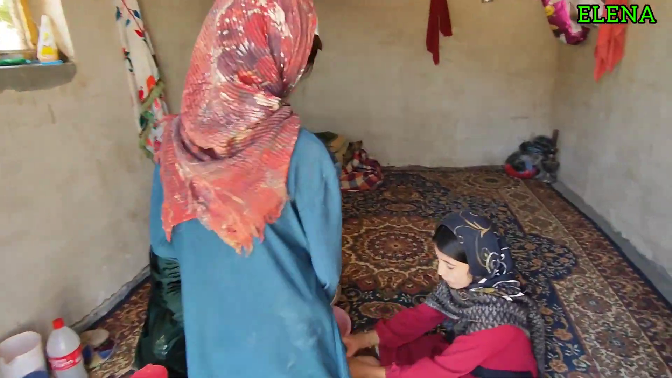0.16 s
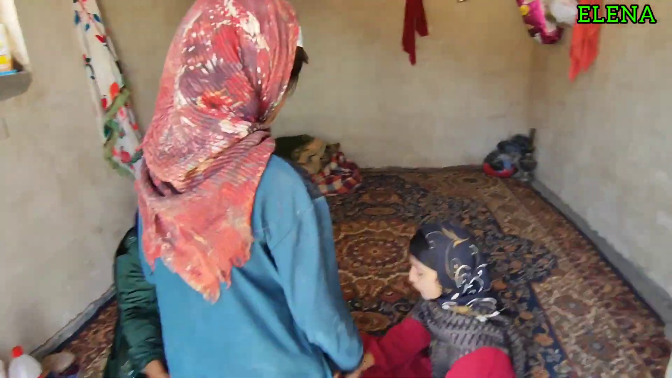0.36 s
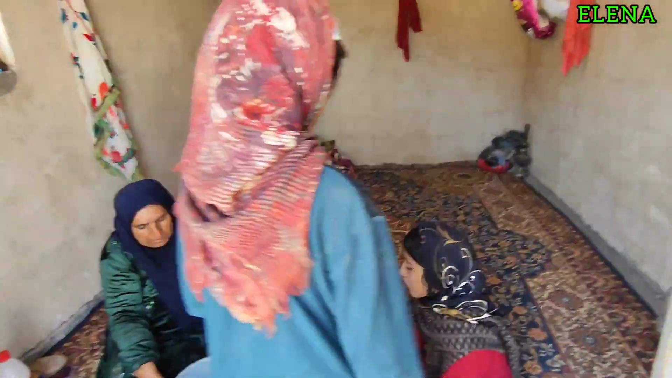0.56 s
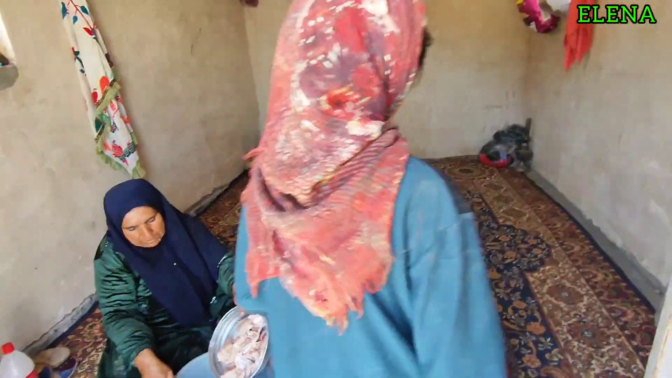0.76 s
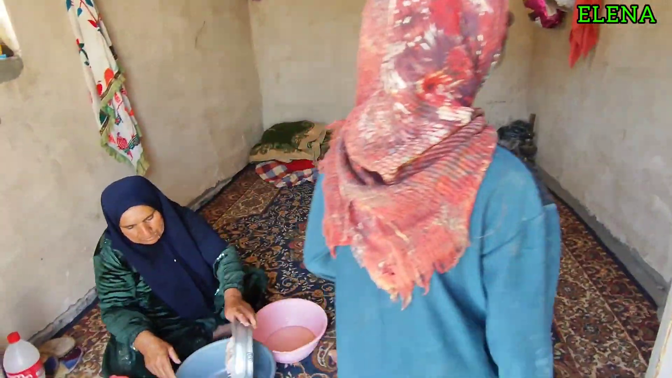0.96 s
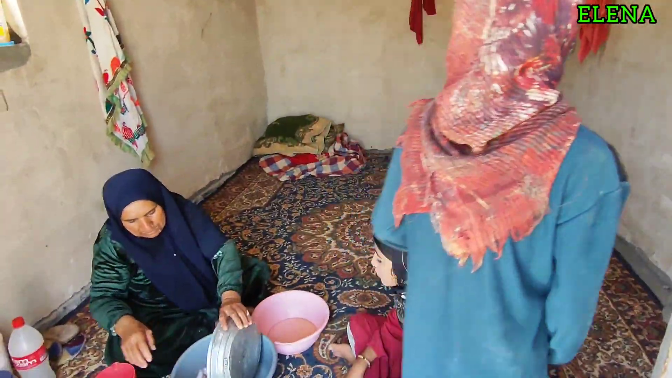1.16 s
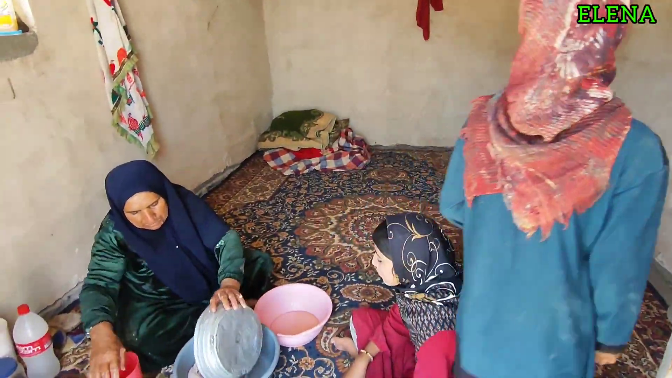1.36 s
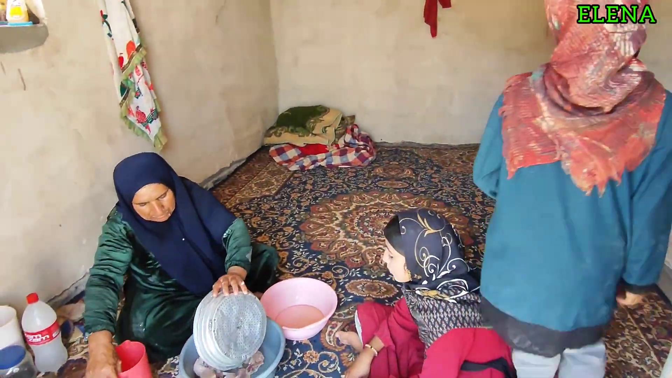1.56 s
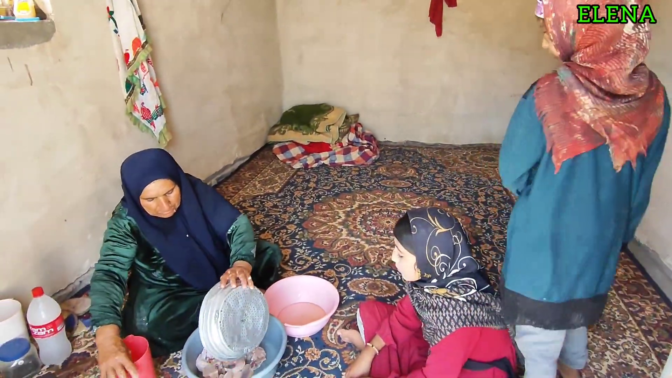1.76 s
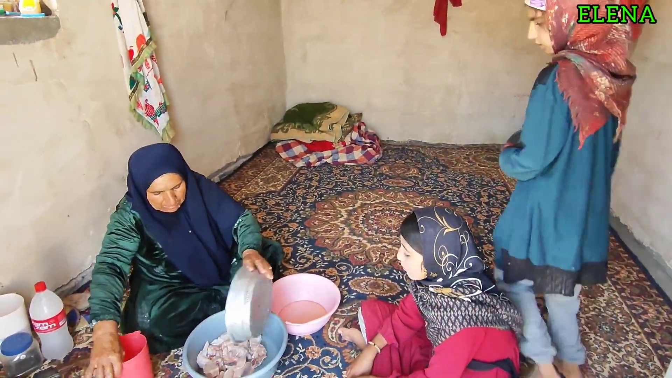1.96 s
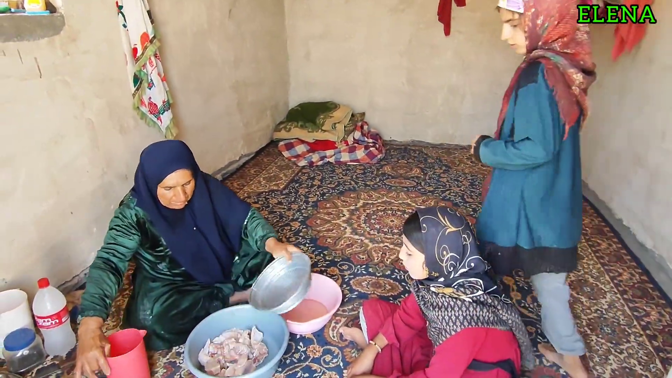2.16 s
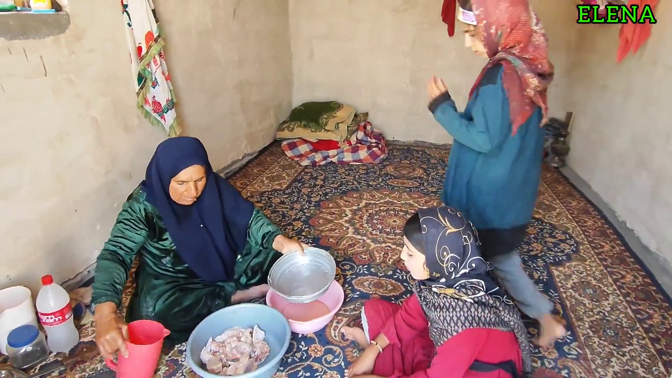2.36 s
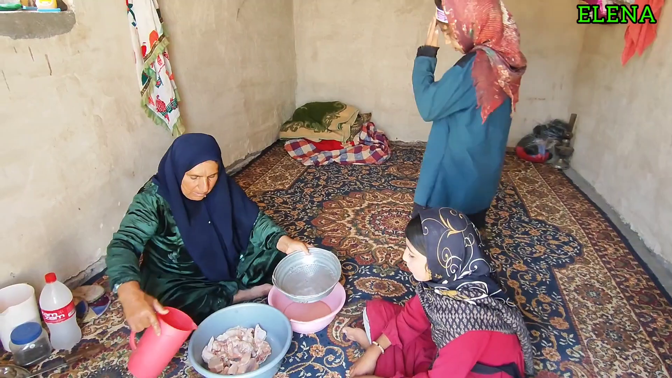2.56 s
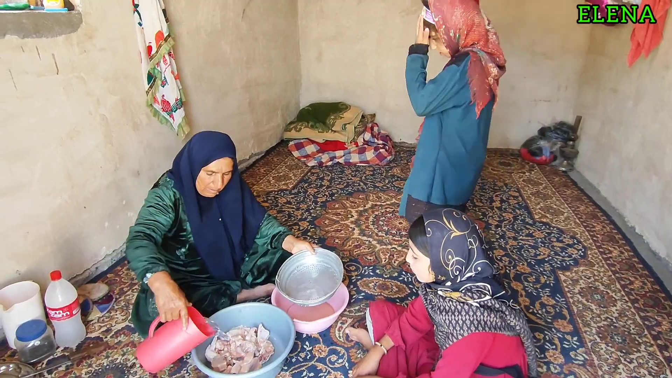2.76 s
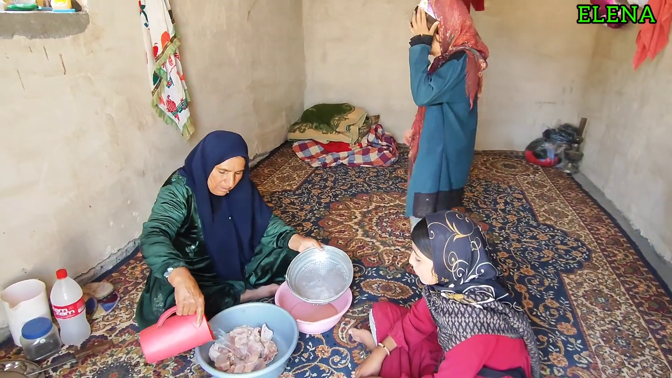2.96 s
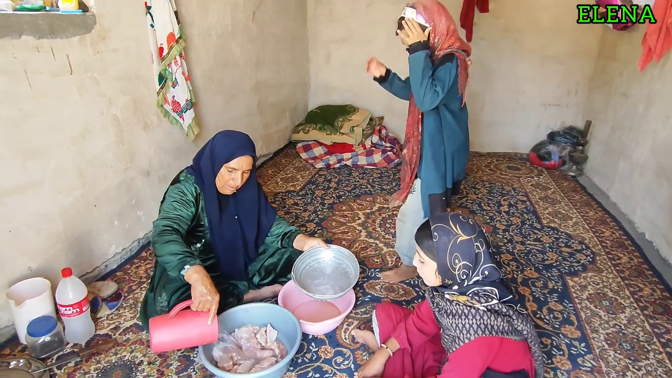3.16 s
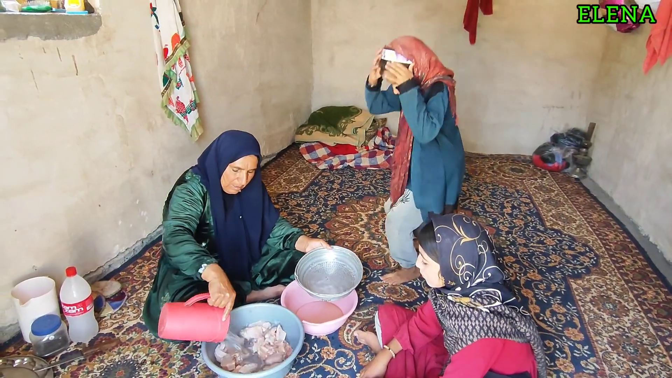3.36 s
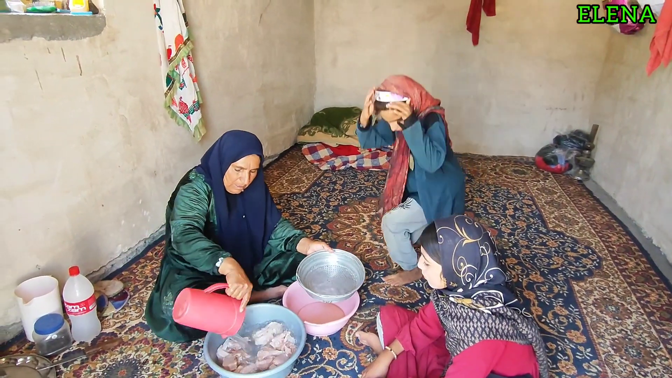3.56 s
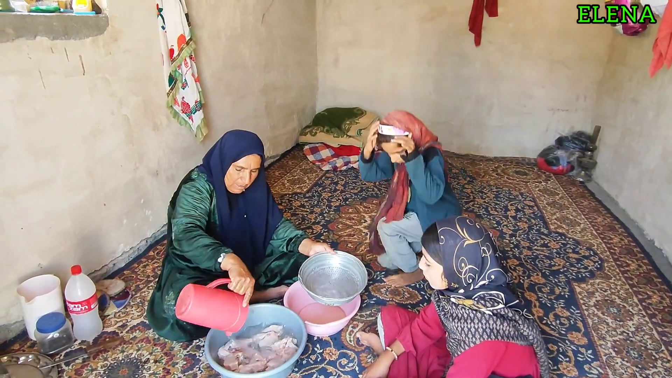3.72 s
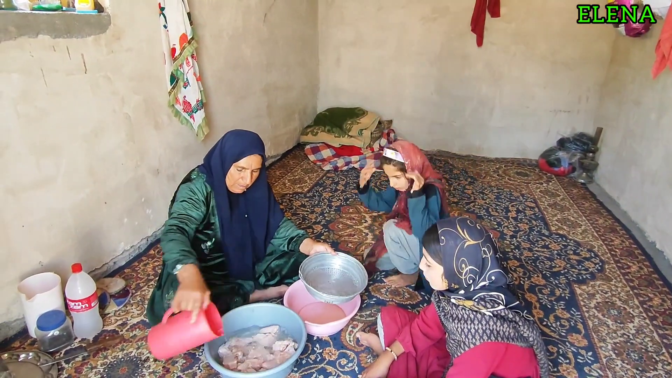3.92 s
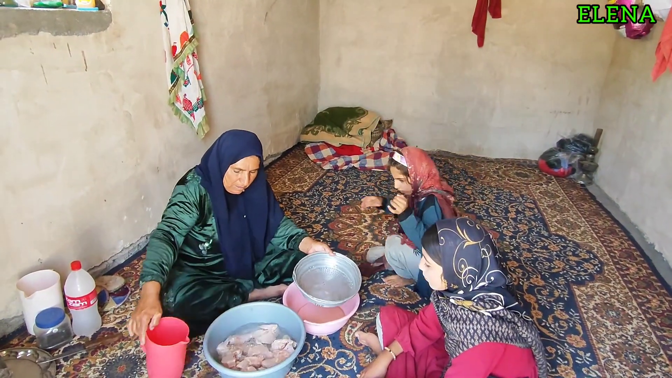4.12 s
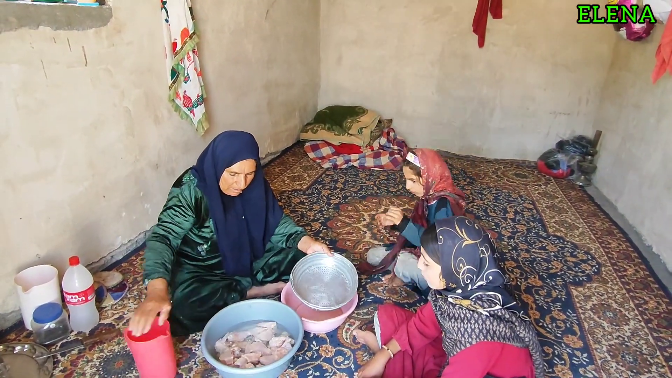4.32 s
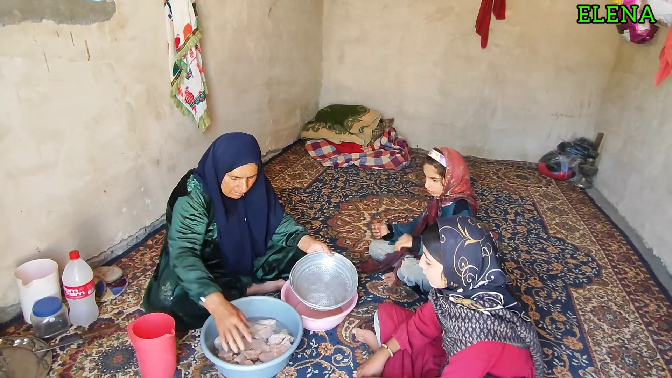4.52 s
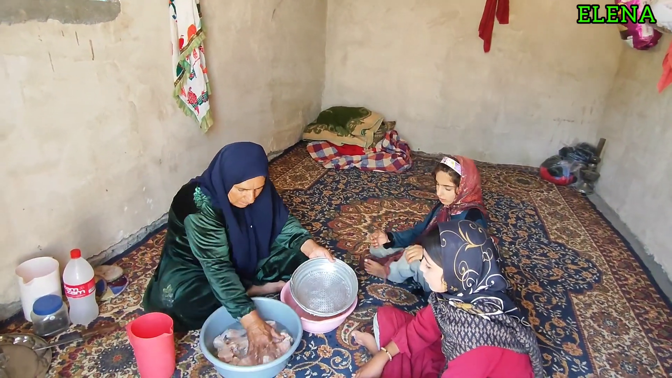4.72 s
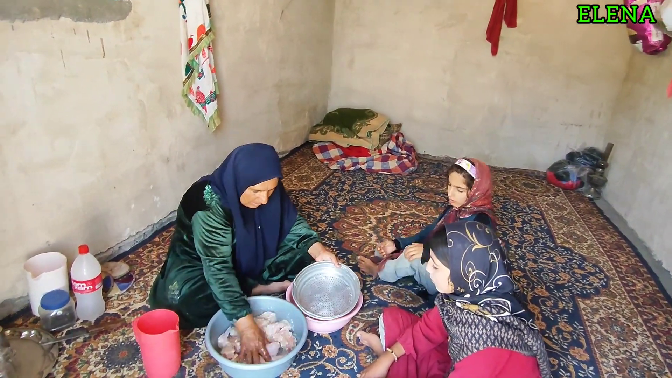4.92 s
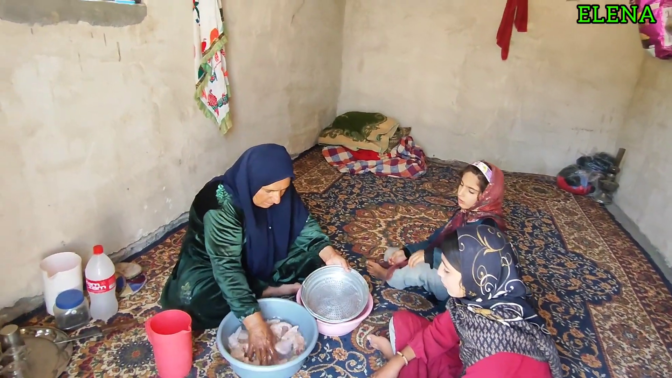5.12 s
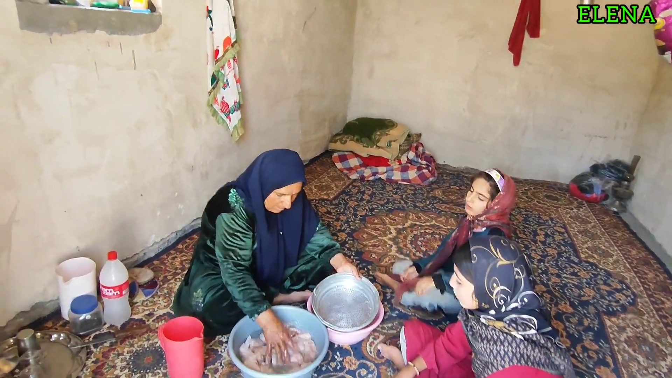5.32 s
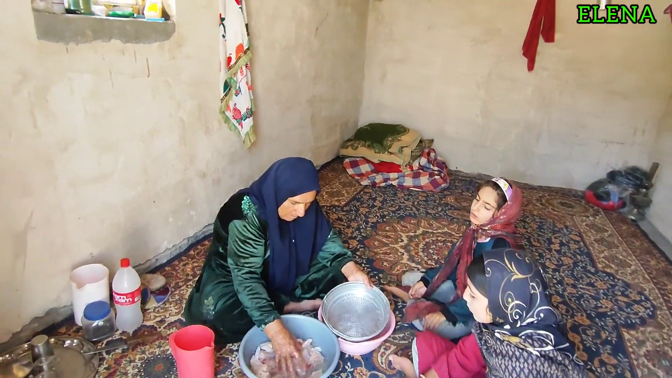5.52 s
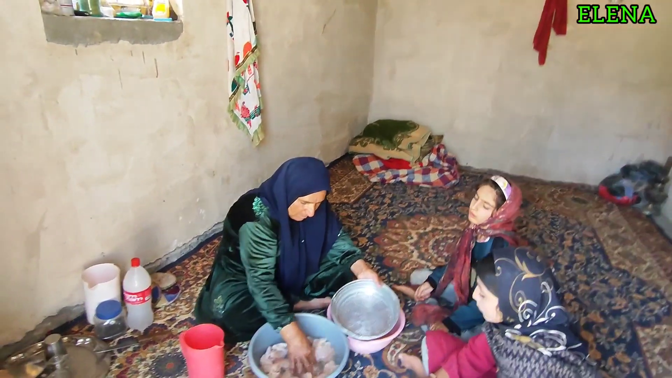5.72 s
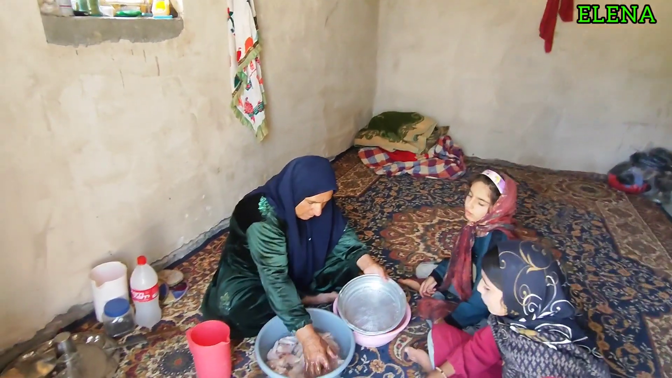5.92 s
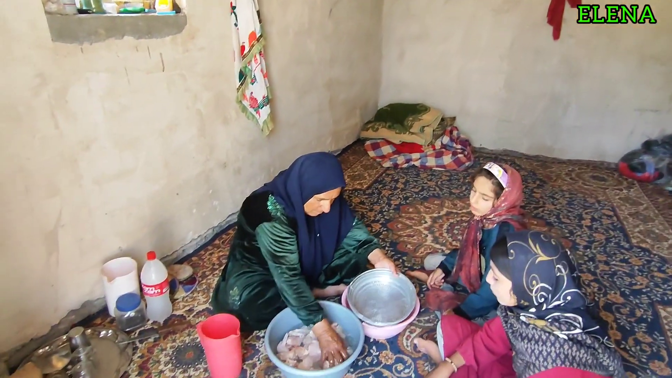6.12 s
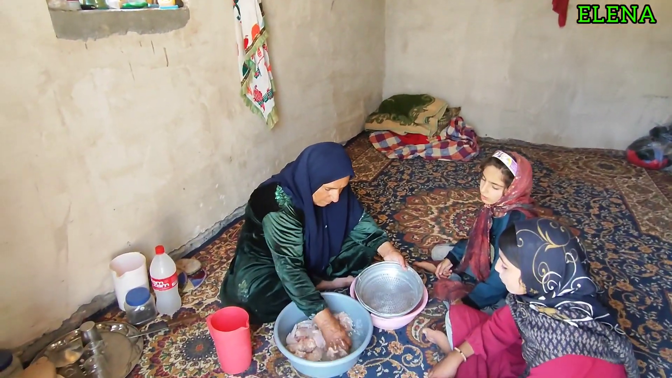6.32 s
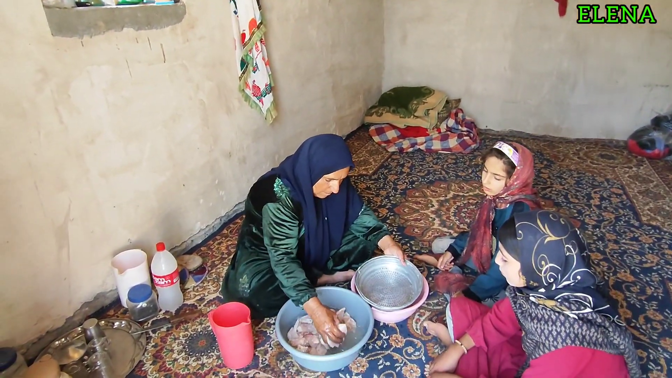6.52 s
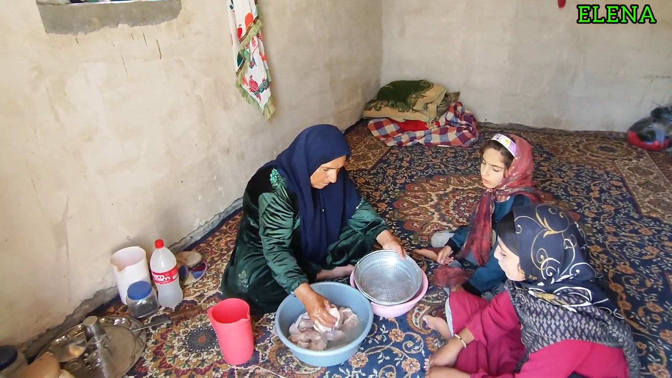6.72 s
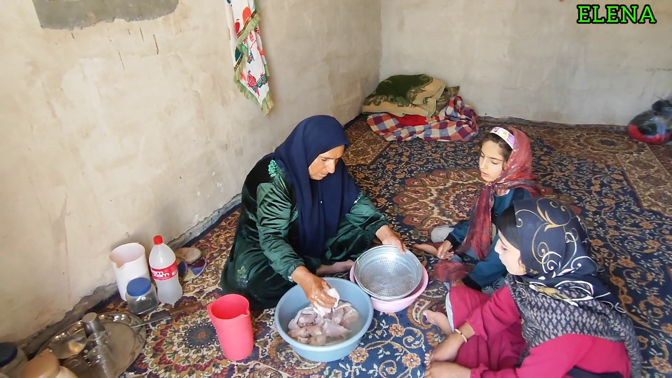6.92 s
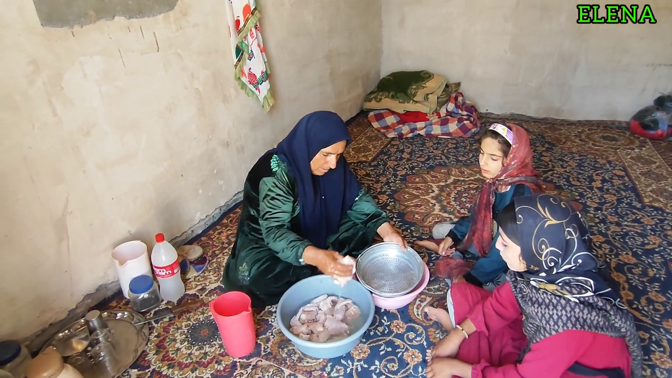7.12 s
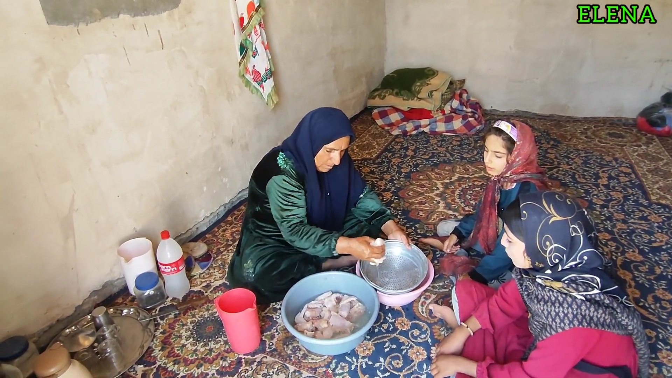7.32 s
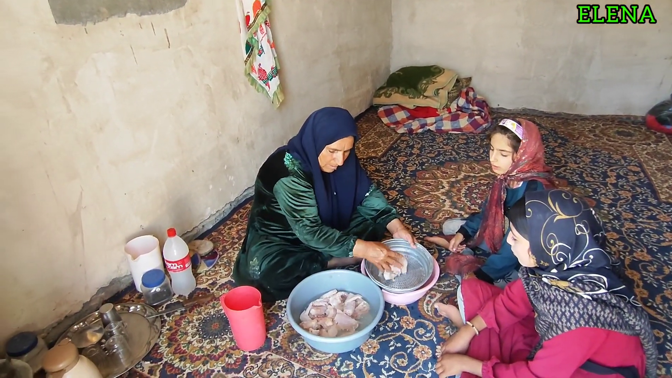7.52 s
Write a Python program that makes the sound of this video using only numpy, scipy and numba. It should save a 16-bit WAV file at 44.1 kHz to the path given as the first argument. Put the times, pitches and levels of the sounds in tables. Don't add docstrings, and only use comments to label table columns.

```python
import sys
import numpy as np
from scipy import signal
from scipy.fft import rfft, irfft, next_fast_len
from scipy.io import wavfile
from numba import njit

SR = 44100
rng = np.random.default_rng(int(sys.argv[2]) if len(sys.argv) > 2 else 0)


def gain_from_db(level_db):
    decades = np.asarray(level_db, float) / 20
    return 10 ** decades


def waveform_to_disk(signal):
    frames = np.transpose(np.atleast_2d(signal))
    scaled = np.clip(frames, -1, 1) * 32767
    samples = np.round(scaled).astype(np.int16)
    wavfile.write(sys.argv[1], SR, samples)


N = 338688

# frequency in Hz, level in dB per Hz.
HUSH_COLOUR = [(12, -59), (20, -14), (48, -5), (69, -9.5), (86, -2), (266, -9.5), (341, -14), (449, -12.5),
               (870, -23), (1030, -23.5), (1930, -26), (3900, -29.5), (5800, -31), (7900, -34),
               (11600, -25.5), (14400, -30)]
# time in seconds, level in dB.
HISS_LIFT = [(0, -3), (1.9, -5.5), (2.3, -8.5), (2.8, -6.5), (3.9, 2), (4.4, 2.5), (4.5, -0.5),
             (7.68, -4.5)]
# frequency in Hz, likeness from -1 to 1.
PORT_LIKENESS = [(60, 0.51), (180, 0.9), (530, 0.29), (1580, -0.16), (4700, 0.089), (14000, -0.19)]
# frequency in Hz, time to die 60 dB in seconds.
ROOM_T60 = [(100, 0.39), (400, 0.14), (1500, 0.22), (5000, 0.16), (14000, 0.14)]
# frequency in Hz, left minus right in dB.
PORT_COLOUR = [(60, 2), (110, 1), (200, 1), (370, -2.5), (680, 0), (1240, 1), (2270, -3.5), (4160, 2.5),
               (8500, -13), (14000, -5)]
# samples by which left leads, left minus right in dB.
SPOTS = [(21, -0.5), (12, -6), (3, -1)]
# start in seconds, peak in dB, pitch in Hz.
FOOTFALLS = [(1.299, -52, 50), (3.799, -51, 43.1), (4.056, -52.5, 85), (7.598, -50, 48)]
# start in seconds, peak in dB, pitch in Hz, time to die 60 dB in seconds.
FLOOR_THUDS = [(0.26, -42, 152, 0.18), (0.382, -32, 126, 0.27), (0.902, -42.5, 225, 0.1),
               (1.137, -42, 188, 0.13), (1.17, -34.5, 127, 0.14), (1.464, -45, 140, 0.14),
               (2.72, -44, 130, 0.06), (2.99, -48, 145, 0.11), (4.198, -38.5, 149, 0.1)]
# start in seconds, peak in dB, pitch in Hz, time to die 60 dB in seconds.
JUG_AND_BOWL = [
    (4.195, -25, 360, 0.045),
    (4.21, -38, 440, 0.11),
    (4.225, -32.5, 360, 0.17),
    (4.198, -33.5, 206, 0.06),
    (7.618, -22, 478, 0.05),
    (7.642, -39, 470, .1),
    (7.57, -33, 640, .06),
]
# start in seconds, peak in dB, pitch in Hz, time to die 60 dB in seconds.
SIEVE_PINGS = [(0.246, -24.5, 1153, 0.035), (0.262, -33, 2080, 0.03), (0.249, -32.5, 560, 0.058),
               (0.25, -33, 1430, 0.03), (0.905, -24, 1030, 0.014), (0.903, -26, 620, .014),
               (1.144, -27, 1100, .03), (1.139, -24.5, 1145, 0.025), (1.209, -36, 1125, 0.048),
               (1.465, -51, 890, 0.027), (2.718, -54, 986, 0.02), (7.432, -41.5, 1200, 0.0053),
               (7.432, -47, 3100, 0.004), (7.564, -25.5, 2260, 0.022), (7.57, -33, 782, 0.047)]
# start in seconds, time held in seconds, level in dB, low edge in Hz, high edge in Hz.
SCUFFS = [(0.866, .04, -42, 1500, 4600), (1.085, .015, -42, 1100, 3600), (1.61, .025, -63, 2200, 5000),
          (1.698, .04, -58, 1000, 5500), (1.737, .035, -51, 500, 1500), (2.087, .02, -62, 2400, 6000),
          (2.168, .06, -63, 2500, 6000), (5.684, .035, -55, 2900, 6000), (5.77, .055, -59, 2300, 3100),
          (5.848, .012, -62, 1000, 3600), (6.012, .055, -62, 3800, 4700), (6.16, .03, -55, 2200, 3100),
          (7.48, .015, -64, 1200, 3800), (7.505, .04, -58, 700, 2600), (7.556, .015, -35, 800, 5000),
          (0.971, .008, -44, 600, 1500), (3.39, .008, -46, 1500, 3400), (6.098, .008, -44, 700, 1500),
          (6.439, .01, -55, 500, 2000), (0.866, .045, -46, 4400, 14000), (7.556, .02, -41, 850, 1350),
          (1.737, .008, -47, 600, 2300), (6.74, .13, -69, 3500, 13000), (6.88, .12, -69, 4000, 13000),
          (6.1, .12, -55, 1000, 3500), (.72, .12, -70, 4000, 12000)]
# start in seconds, end in seconds, level in dB, two pitches in Hz.
TRICKLE = (1.88, 2.66, -65.5, [1950, 2500])
# start in seconds, peak in dB, hollow note in Hz,
# its time to die 60 dB in seconds, wall ring in dB.
KNOCKS = [(0.246, -25.5, 262, 0.12, -30.5), (0.3, -29.5, 262, 0.08, -48), (0.382, -19, 244, 0.045, -51),
          (0.459, -36, 327, 0.067, -48), (0.615, -41.5, 437, 0.039, -53), (0.903, -18, 503, 0.11, -44),
          (0.972, -27.5, 499.4, 0.11, -47), (1.113, -19.5, 262, 0.032, -53), (1.138, -23, 203, 0.04, -36),
          (1.157, -18, 304, 0.031, -52), (1.181, -29, 505, 0.065, -35.5), (1.209, -30.5, 249, 0.085, -36),
          (1.25, -30, 468, 0.07, -58), (1.467, -22.5, 317, 0.026, -62), (1.473, -33.5, 522, 0.095, -53.5),
          (1.737, -39, 300, 0.06, -49), (2.719, -36.5, 300, 0.028, -49), (7.496, -55, 484, 0.1, -64),
          (7.559, -40, 480, 0.03, -41), (7.618, -40, 478, 0.05, -44)]
# frequency in Hz, level in dB, time to die 60 dB in seconds.
WALL_MODES = [(501, 15, 0.32), (640, 4, 0.1), (853, -16, 0.047), (970, 0, 0.043), (1140, 1, 0.04),
              (1440, -6, 0.09), (1857, 10, 0.069), (2077, 10.5, 0.3), (2290, 3, 0.047)]
# start in seconds, peak in dB, centre in Hz.
SPATTERS = [(0.868, -35, 4270), (1.044, -41, 5970), (1.174, -37, 9900), (1.596, -38.5, 4300),
            (1.705, -47, 7000), (2.718, -43.5, 4000), (2.871, -48, 10200), (3.081, -38, 9710),
            (3.437, -34, 5800), (3.997, -46.5, 10400), (4.719, -39.5, 9700), (4.849, -40, 11800),
            (4.881, -38, 11000), (5.016, -38, 10200), (5.338, -37, 4670), (5.378, -38, 9970),
            (5.415, -31.5, 9350), (5.635, -40, 9800), (5.686, -36.5, 4180), (5.774, -40.5, 9000),
            (6.14, -41, 6540), (6.176, -39, 9450), (6.27, -28, 5500), (6.467, -44, 4700),
            (6.75, -49.5, 11500), (7.174, -47, 9330), (7.362, -44, 9600), (7.425, -49, 11900),
            (7.496, -35.5, 11900), (7.556, -29, 11600)]
# start in seconds, peak in dB, centre in Hz.
SPECKS = [(4.4874, -53.5, 11800), (4.8224, -49, 11400), (4.9531, -45, 11700), (5.0409, -40, 9700),
          (5.1272, -45, 9520), (5.1726, -43, 9400), (5.2729, -52, 12000), (5.4939, -54, 11600),
          (5.5363, -53, 9430), (5.5807, -52.5, 8720), (5.7054, -44, 10400), (5.9274, -49, 9950),
          (6.0736, -46, 9460), (6.2577, -27, 9300), (6.564, -50, 11800), (6.5994, -55, 9690),
          (6.7161, -53, 11700), (6.8094, -51, 11500), (6.8743, -54, 10200), (6.9556, -52, 11000),
          (6.979, -55, 11700), (7.0429, -50, 9110), (7.3128, -57, 11800)]
# start in seconds, peak in dB, pitch in Hz, time to die 60 dB in seconds.
GULPS = [(2.932, -41, 476, 0.034), (2.991, -42, 810, 0.034), (3.401, -38.5, 814, 0.05),
         (3.668, -43, 590, 0.089), (4.704, -34, 360, 0.032), (4.888, -34.5, 474, 0.085),
         (5.008, -36.5, 514, 0.043), (5.017, -30, 957, 0.03), (5.126, -29, 374, 0.021),
         (5.378, -30.5, 865, 0.033), (5.571, -45, 495, 0.055), (5.631, -38, 1795, 0.083),
         (5.911, -25, 453, 0.048), (6.076, -23.5, 385, 0.025), (6.1, -32.5, 950, 0.03),
         (6.248, -34, 930, 0.047), (6.296, -38.5, 478, 0.059), (6.44, -46, 840, 0.04),
         (6.556, -47.5, 1755, 0.087), (7.433, -38, 1090, 0.0055)]
# start in seconds, peak in dB, pitch in Hz.
BLIPS = [(2.858, -50, 3940), (2.887, -47, 3170), (2.901, -43, 2450), (2.966, -47, 2970), (2.988, -43, 4050),
         (3.031, -42, 3900), (3.119, -45, 2040), (3.25, -47, 3200), (3.35, -43.5, 2540),
         (3.39, -37.5, 2020), (3.392, -42, 1710), (3.404, -44, 3060), (3.414, -46, 2580),
         (3.598, -48.5, 4000), (3.614, -45, 1980), (3.637, -45, 2760), (3.689, -45, 2790),
         (3.707, -48, 1120), (3.713, -43, 2540), (3.753, -49, 3190), (4.681, -52, 1170), (4.706, -50, 2030),
         (4.765, -51.5, 4130), (4.824, -41, 1770), (4.882, -41, 2930), (4.887, -44, 4270),
         (4.91, -42, 1440), (4.983, -43, 1910), (5.014, -46, 3010), (5.029, -39, 1770), (5.066, -45, 2290),
         (5.117, -45, 1940), (5.157, -48, 1940), (5.19, -48, 2070), (5.262, -47, 1030), (5.3, -46, 1040),
         (5.363, -44.5, 1980), (5.379, -48, 2540), (5.382, -44, 1970), (5.392, -48, 3010),
         (5.419, -43, 2410), (5.432, -44, 1770), (5.48, -43, 1320), (5.595, -51, 1790),
         (5.628, -47.5, 2820), (5.917, -44, 1260), (5.968, -46, 2300), (6.056, -47, 1590),
         (6.076, -47, 2450), (6.142, -39, 950), (6.223, -50, 2890), (6.244, -48, 3570), (6.27, -39, 4270),
         (6.292, -45, 2280), (7.56, -33, 3260), (7.561, -37, 2870), (7.561, -37, 4050), (7.566, -35, 1180),
         (1.088, -39, 2600), (1.1, -40, 2050)]
# start in seconds,
# peak in dB, pitch in Hz.
DROPS = [(0.868, -39.5, 2960), (1.086, -36, 1300), (2.901, -35.5, 2060), (2.987, -40, 2050),
         (3.032, -43, 2370), (3.14, -38, 2050), (3.259, -31, 2030), (3.392, -34.5, 2660),
         (3.618, -42, 2750), (3.708, -36, 1980), (3.739, -36, 2620), (3.847, -44.5, 4070),
         (4.783, -37, 1310), (4.841, -38.5, 1800), (4.883, -40, 2040), (4.939, -38, 3130),
         (5.017, -38, 2380), (5.051, -34, 1940), (5.144, -42, 4060), (5.2, -45, 4300), (5.218, -41.5, 1570),
         (5.492, -38.5, 3380), (5.683, -45, 1690), (5.758, -48, 1860), (5.801, -43, 2820),
         (5.852, -43, 1920), (5.966, -42, 1170), (6.122, -34.5, 1720), (6.17, -40.5, 2670),
         (6.213, -38.5, 1430), (6.259, -34, 1850), (6.37, -42, 4400), (6.54, -57, 2930),
         (6.815, -50.5, 2730), (6.955, -49.5, 2680), (7.035, -54, 4460), (7.087, -54, 2720),
         (7.106, -52, 3480), (7.39, -59, 4380)]
# frequency in Hz, level in dB per Hz.
WATER_COLOUR = [(88, -38), (150, -11), (382, -5), (746, -4), (790, -2), (1510, -3), (1980, 1), (3570, -6.5),
                (4320, -5), (5100, -12.5), (6840, -14), (7820, -26), (9640, -14), (12500, -22),
                (14400, -24)]
# time in seconds, flow in dB, fineness in dB.
FLOW = [(0.0, -62.5, -4.0), (0.699, -67.5, -8.5), (1.349, -61.5, -2.5), (1.856, -63, 0.5),
        (2.643, -70.5, -7.5), (2.807, -74.0, 4), (2.892, -49.5, 9.5), (3.082, -46, 2.5), (3.597, -48.5, -3),
        (3.761, -50.5, 11.0), (3.901, -63.5, 4.5), (4.546, -76, 15), (4.694, -54.5, 5.5), (5.307, -51, -2),
        (5.597, -60.5, 5), (5.869, -60.5, 0), (6.371, -52.5, -1), (6.634, -85, 7.5)]
# crest in seconds, peak in dB, fineness in dB, time to die 60 dB in seconds.
SLAPS = [(0.248, -37, -7.0, 0.35), (0.382, -50, -17, 0.33), (0.47, -50.5, -7.5, 0.47),
         (0.875, -50, 4, 0.13), (0.906, -49, -12, 0.15), (0.95, -53, -10, 0.3), (1.114, -41.5, -9.5, 0),
         (1.155, -45.5, -18.5, 0.37), (1.473, -58, -8.0, 0.75), (1.603, -65.0, -15.5, 0.7),
         (2.719, -49.5, -9, 0.23), (2.781, -61.5, -14.5, 0.3), (5.919, -46.5, -8.5, 0.06),
         (5.95, -55, -12, 1.2), (6.086, -48.0, -13.5, 0.6), (6.456, -58, -12, 0.48), (7.575, -45, 0, 0.25),
         (7.63, -56, -13.0, 1)]
# crest in seconds, peak in dB, fineness in dB, time to die 60 dB in seconds.
SURGES = [(1.071, -43.5, 4, 0.5), (1.182, -45.5, 8.5, 0.36), (1.221, -48.5, -11, 0.4),
          (1.745, -54, 4, 0.15), (2.19, -56, 8.5, 0.2), (2.98, -42.0, -0.5, 0.14), (3.273, -46.5, -4, 0.5),
          (3.409, -39.5, -1, 0.49), (3.709, -43.5, -2.5, 0.26), (4.077, -70, -14.5, 1.06),
          (4.731, -51, -11, 0.2), (4.908, -41.5, -1.5, 0.42), (5.032, -40.5, 2, 0.14),
          (5.163, -46.5, 5, 0.3), (5.385, -47.5, -1.0, 0.73), (5.438, -46, 0, 0.39),
          (5.597, -50.0, -0.5, 0.27), (6.049, -49, 2.5, 0.4), (6.269, -40, 14.5, 0.0838),
          (6.276, -41.5, -4.0, 0.46), (6.565, -52, -0.5, 0.16), (7.136, -66.0, 14.5, 0.6),
          (7.234, -66, -17, 0.45)]
POUR_S = (2.8, 3.95)


def rms_one(x):
    return x / np.sqrt(np.mean(x ** 2) + 1e-20)


def in_time(rows):
    s, *columns = np.transpose(rows)
    return [np.interp(np.arange(N) / SR, s, c) for c in columns]


def at_hz(points, hz):
    point_hz, value = np.transpose(points)
    return np.interp(np.log(np.maximum(hz, 1)), np.log(point_hz), value)


def coloured(x, points, share=1):
    size = next_fast_len(N + 4096)
    gain = gain_from_db(share * at_hz(points, np.fft.rfftfreq(size, 1 / SR)))
    return irfft(rfft(x, size) * gain, size)[..., :N]


def band(x, low_hz, high_hz):
    sos = signal.butter(2, [low_hz, min(high_hz, .45 * SR)], "band", fs=SR, output="sos")
    return signal.sosfilt(sos, x)


def drift(rate):
    r = np.exp(-80 * np.pi * rate / SR)
    white = rng.standard_normal(N // 40 + 2002)
    slow = rms_one(signal.lfilter([1], [1, -2 * r, r * r], white)[2000:])
    return np.interp(np.arange(N) / 40, np.arange(len(slow)), slow)


@njit
def add_rings(out, start, gain, turn, length, rise, swell):
    for k in range(len(start)):
        fade, level, phase = 1000.0 ** (-1.0 / length[k]), gain[k], 0.0
        for i in range(min(int(length[k]), out.shape[1] - start[k])):
            out[k % 3, start[k] + i] += level * np.sin(phase) * min(phase / swell, 1.0)
            phase += turn[k] * (1 + rise[k] * i / length[k])
            level *= fade


def rings(s, gain, hz, t60, rise, swell=4.9):
    out, same = np.zeros((3, N)), np.ones(len(s))
    start = (s * SR).astype(np.int64)
    turn = 2 * np.pi * hz / SR * same
    length = np.clip(t60, .0005, .6) * SR * same
    add_rings(out, start, gain * same, turn, length, rise * same, swell)
    return out


def cluster(s, db, hz, t60, count, within_s, spread):
    draw = rng.random((len(s), count, 3))
    late = within_s * draw[..., 0] ** 2 * (np.arange(count) > 0)
    pitch = np.minimum(hz[:, None] * np.exp(spread * (draw[..., 1] - .5)), .4 * SR)
    gain = gain_from_db(db[:, None] - 10 * draw[..., 2] - 12 * late / within_s)
    return rings((s[:, None] + late).ravel(), gain.ravel(), pitch.ravel(), t60, 0.1)


def bursts(s, db, t60, low_hz, high_hz, swell_s):
    strike = np.zeros((3, N))
    strike[np.arange(len(s)) % 3, (s * SR).astype(int)] = gain_from_db(db)
    dying = signal.lfilter([1], [1, -gain_from_db(-60 / (t60 * SR))], strike + 1e-18)
    r = np.exp(-1 / (swell_s * SR))
    swelling = signal.lfilter([1 - r], [1, -r], dying)
    return swelling * rms_one(band(rng.standard_normal(N), low_hz, high_hz))


def centred(x, spot=2):
    return x.sum(axis=0) * (np.arange(3)[:, None] == spot)


def hush():
    out, edges = 0, 20 * 2 ** np.arange(0, 10, .5)
    together, flicker = drift(1.5), drift(12)
    white = rng.standard_normal((2, 2, N))
    lift_db = in_time(HISS_LIFT)[0]
    for k, (low, high) in enumerate(zip(edges, edges[1:])):
        mid, side = band(white[k % 2], low, high)
        hz = np.sqrt(low * high)
        alike = np.clip(at_hz(PORT_LIKENESS, hz), -1, 1)
        wander_db = 1.2 * (0.22 * together + drift(15))
        hiss_db = (lift_db + 1.9 * flicker) * (hz > 5000)
        pair = np.sqrt(1 + alike) * mid + np.sqrt(1 - alike) * side * [[1], [-1]]
        out = out + gain_from_db(wander_db + hiss_db) * pair
    return gain_from_db(-58.5) * rms_one(coloured(out, HUSH_COLOUR))


def room(x):
    t = np.arange(SR // 2) / SR
    edges, tail = 60 * 2 ** np.arange(9), 0
    white = rng.standard_normal((2, 3, len(t)))
    for low, high in zip(edges, edges[1:]):
        t60 = at_hz(ROOM_T60, np.sqrt(low * high))
        mid, side = band(white, low, high) * gain_from_db(-60 * t / t60)
        side = band(side, 420, 19400)
        tail = tail + mid + np.stack([side, -side])
    tail = tail * np.clip((t - .002) / 0.0014, 0, 1)
    heard = signal.fftconvolve(x[None], tail / np.sqrt(np.sum(tail ** 2) / 6), axes=2)
    return heard[..., :N].sum(axis=1)


def footfalls():
    s, db, hz = np.transpose(FOOTFALLS)
    return centred(rings(s, gain_from_db(db - 3.0), hz, 0.35, 0))


def floor_thuds():
    s, db, hz, t60 = np.transpose(FLOOR_THUDS)
    return centred(rings(s, gain_from_db(db + 1.0), hz, t60, 0.05))


def jug_and_bowl():
    s, db, hz, t60 = np.transpose(JUG_AND_BOWL)
    return centred(rings(s, gain_from_db(db), hz, t60, 0.03, swell=12.4))


def scuffs():
    out, t = np.zeros((3, N)), np.arange(SR // 5) / SR
    grain = gain_from_db(3 * drift(60))
    for s, held, db, low_hz, high_hz in SCUFFS:
        hiss = band(rng.standard_normal((3, len(t))), low_hz, high_hz)
        hiss = rms_one(band(hiss, low_hz, high_hz))
        dying_db = -60 * np.maximum(t - held, 0) / .07
        shape = np.minimum(t / .001, 1) * gain_from_db(db - 5 + dying_db)
        part = out[:, int(s * SR):int(s * SR) + len(t)]
        part += (hiss * shape)[:, :part.shape[1]]
    return out * grain


def trickle():
    start, end, db, pitches = TRICKLE
    s = np.arange(start, end, .012)
    draw = rng.random((len(s), 3))
    hz = np.resize(pitches, len(s)) * (.96 + .08 * draw[:, 2])
    return rings(s + 0.012 * draw[:, 0], gain_from_db(db - 8 * draw[:, 1]), hz, 0.053, 0.03)


def sieve_pings():
    s, db, hz, t60 = np.transpose(SIEVE_PINGS)
    return centred(rings(s, gain_from_db(db + 1.0), hz, t60, 0.05))


def knocks():
    s, db, hz, t60, wall_db = np.transpose(KNOCKS)
    sieve_hz = 490
    basin_notes = centred(rings(s, gain_from_db(db - 3.5) * (hz < sieve_hz), hz, t60, 0))
    sieve_notes = centred(rings(s, gain_from_db(db - 1.0) * (hz > sieve_hz), hz, t60, 0), spot=0)
    out = basin_notes + sieve_notes
    clatter = bursts(s, wall_db + 0.5, 0.037, 470, 1600, swell_s=0.00085)
    for mode_hz, mode_db, mode_t60 in WALL_MODES:
        r = gain_from_db(-60 / (mode_t60 * 0.58 * SR))
        resonance = [1, -2 * r * np.cos(2 * np.pi * mode_hz / SR), r * r]
        out = out + gain_from_db(mode_db) * signal.lfilter([1 - r, 0, r - 1], resonance, clatter)
    crack = coloured(bursts(s, wall_db - 7, 0.064, 3000, 12000, swell_s=0.00083), WATER_COLOUR)
    return out + gain_from_db(2.0) * clatter + gain_from_db(6.5) * crack


def spatters():
    s, db, hz = np.transpose(SPATTERS)
    shower = cluster(s, db - 5, hz, 0.0047, count=20, within_s=0.023, spread=0.52)
    tick = gain_from_db(12) * coloured(bursts(s, db - 11.5, 0.043, 3860, 16000, swell_s=0.0012), WATER_COLOUR)
    s, db, hz = np.transpose(SPECKS)
    return shower + tick + cluster(s, db - 4, hz, 0.004, count=16, within_s=0.023, spread=0.21)


def bubbles():
    s, db, hz, t60 = np.transpose(GULPS)
    gulps = centred(rings(s, gain_from_db(db - 1.5), hz * 0.976, t60, 0.24, swell=6.6))
    s, db, hz = np.transpose(BLIPS)
    return gulps + rings(s, gain_from_db(db + 3.0), hz * .97, 0.027, 0.2, swell=7.1)


def drops():
    s, db, hz = np.transpose(DROPS)
    t60 = 0.029 * gain_from_db(-0.29 * (db + 40.5))
    first = rings(s, gain_from_db(db), hz * .96, t60, 0.25)
    return first + cluster(s, db - 9.5, hz, 0.032, count=4, within_s=0.015, spread=0.526)


def heaves(rows, rise, follows):
    s, db, fine, fall = np.transpose(rows)[..., None]
    t = np.arange(0, N + 64, 64) / SR - s
    shape_db = -60 * np.where(t < 0, -t / rise(fall), t / fall)
    power = np.sum(gain_from_db(db + follows * fine + shape_db) ** 2, axis=0)
    return np.interp(np.arange(N) / 64, np.arange(t.shape[1]), power)


def stirred(follows):
    flow_db, fine = in_time(FLOW)
    slaps = heaves(SLAPS, lambda fall: .03, follows)
    surges = heaves(SURGES, lambda fall: .8 * fall, follows)
    return np.sqrt(gain_from_db(flow_db + follows * fine) ** 2 + slaps + surges)


def swarm(per_s, low_hz, high_hz, cycles, spread_db, clump_db, smooth):
    born = np.flatnonzero(rng.random(N) < per_s * gain_from_db(clump_db * drift(25)) / SR)
    draw = rng.random((N, 3))[born]
    hz = low_hz * (high_hz / low_hz) ** draw[:, 0]
    size_db = spread_db * np.minimum(-np.log(draw[:, 1] + 1e-9), 4)
    size = gain_from_db(size_db) * np.sign(draw[:, 2] - .5)
    grains = rings(born / SR, size * hz, hz, cycles / hz, 0.29)
    grains = rms_one(band(grains, low_hz, high_hz))
    rush = rms_one(band(rng.standard_normal((3, N)), low_hz, high_hz))
    return rms_one(coloured(grains + smooth * rush, WATER_COLOUR))


def in_basin(x):
    pouring = (np.arange(N) > POUR_S[0] * SR) & (np.arange(N) < POUR_S[1] * SR)
    return gain_from_db(3.5) * band(x * pouring, 380, 3000) + centred(x * ~pouring)


def water():
    slosh = swarm(450., 200, 1000, cycles=16., spread_db=2.5, clump_db=2.5, smooth=.45)
    fizz = swarm(1800., 902.5, 5516, cycles=37.6, spread_db=3.5, clump_db=4.5, smooth=0.21)
    spray = swarm(3000., 4300, 22200, cycles=28.0, spread_db=6.5, clump_db=5.5, smooth=0.79)
    slosh = gain_from_db(-15) * stirred(-1.016) * in_basin(slosh)
    fizz = gain_from_db(-10) * stirred(0) * fizz
    spray = gain_from_db(-17.5) * stirred(0.92) * spray
    return slosh + fizz + spray


def scene():
    floor = footfalls() + floor_thuds()
    vessels = jug_and_bowl() + sieve_pings() + knocks()
    basin = floor + vessels + trickle() + spatters() + bubbles() + drops() + water()
    around = gain_from_db(0.5) * room(basin) + hush()
    near = basin + scuffs()
    left = sum(x * gain_from_db(db / 2) for x, (lead, db) in zip(near, SPOTS))
    right = sum(np.roll(x, round(lead)) * gain_from_db(-db / 2) for x, (lead, db) in zip(near, SPOTS))
    return np.stack([left, right]) + around


def roll_off(x):
    return signal.sosfilt(signal.butter(12, 14480, fs=SR, output="sos"), x)


def record(dry):
    ports = np.stack([coloured(dry[0], PORT_COLOUR, .5), coloured(dry[1], PORT_COLOUR, -.5)])
    mix = signal.sosfilt(signal.cheby2(14, 50, 14700, fs=SR, output="sos"), ports)
    return roll_off(mix)


dry = scene()
out = record(dry)
waveform_to_disk(out)
```